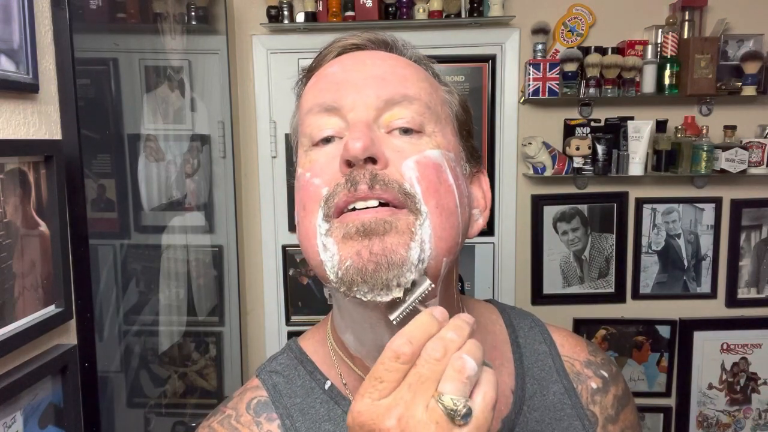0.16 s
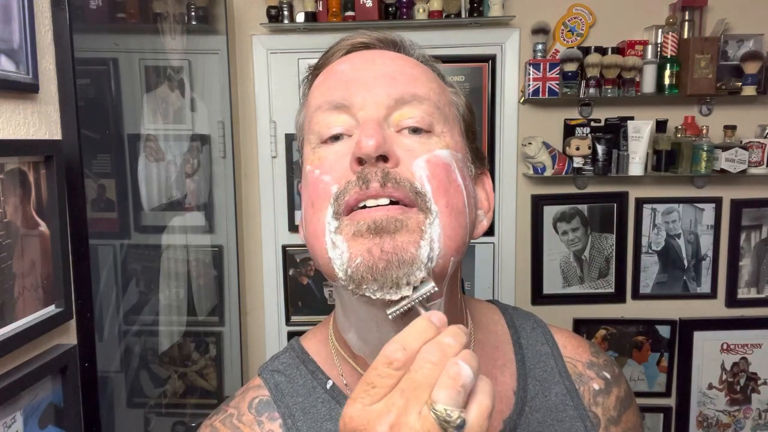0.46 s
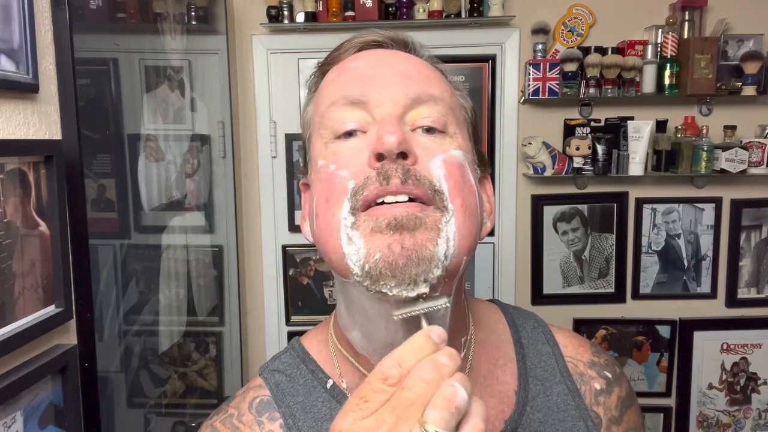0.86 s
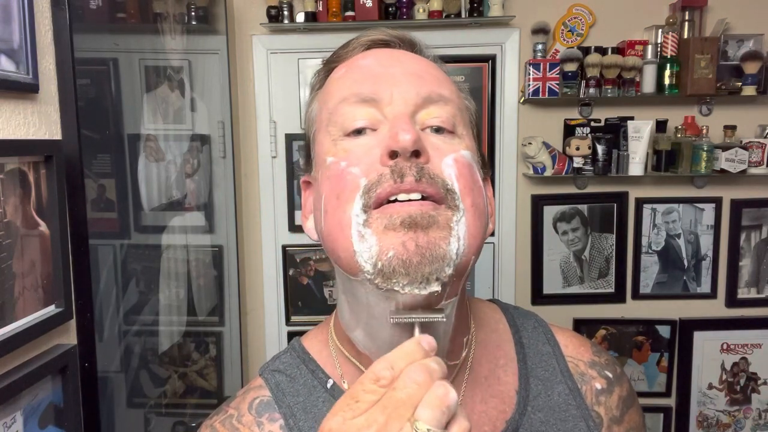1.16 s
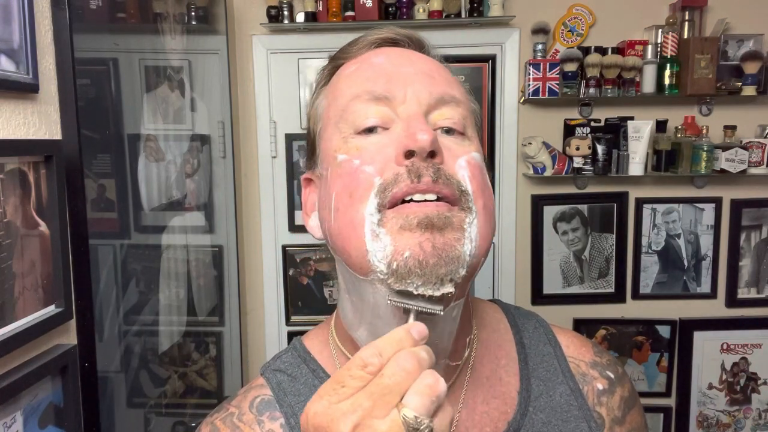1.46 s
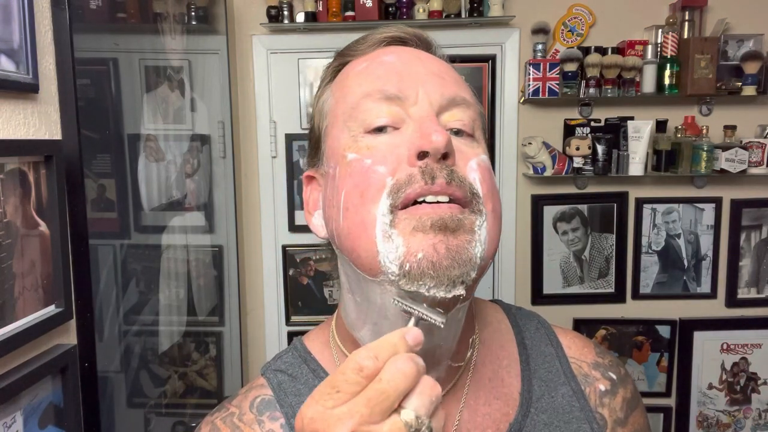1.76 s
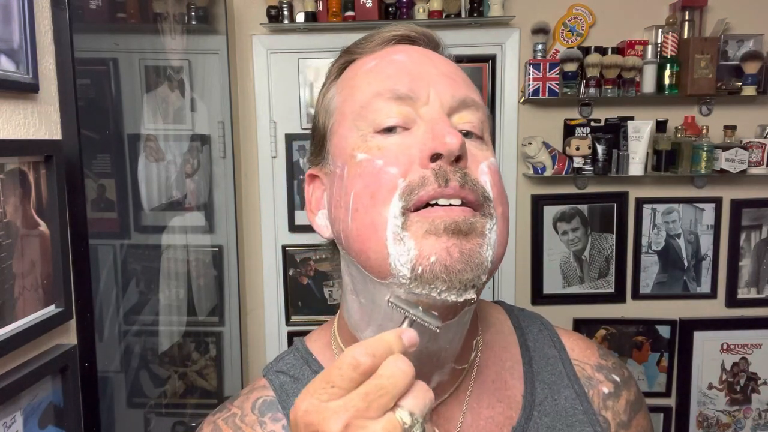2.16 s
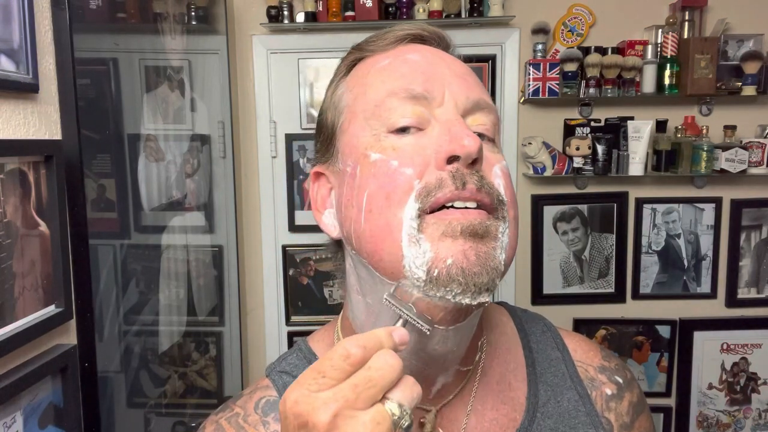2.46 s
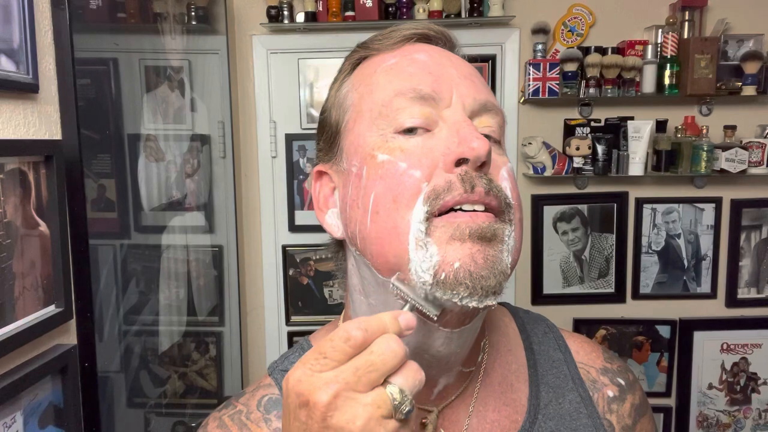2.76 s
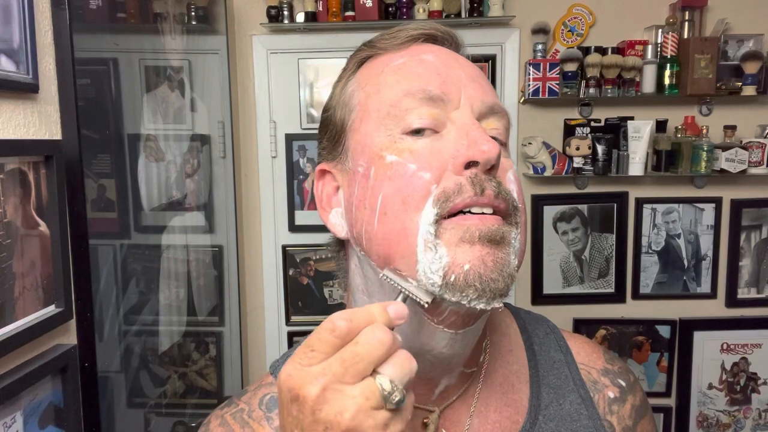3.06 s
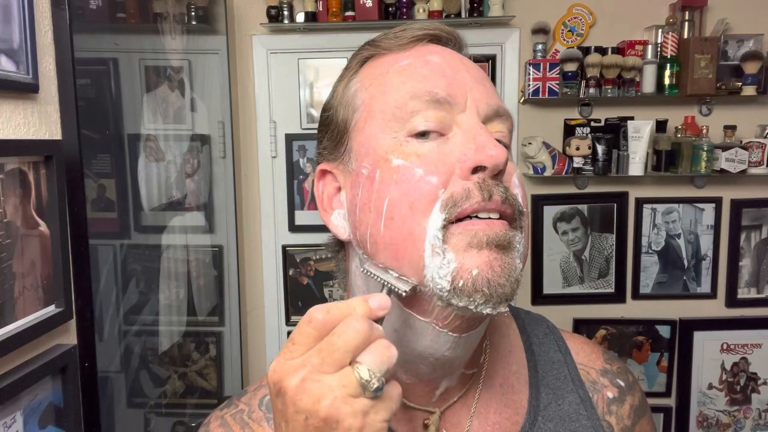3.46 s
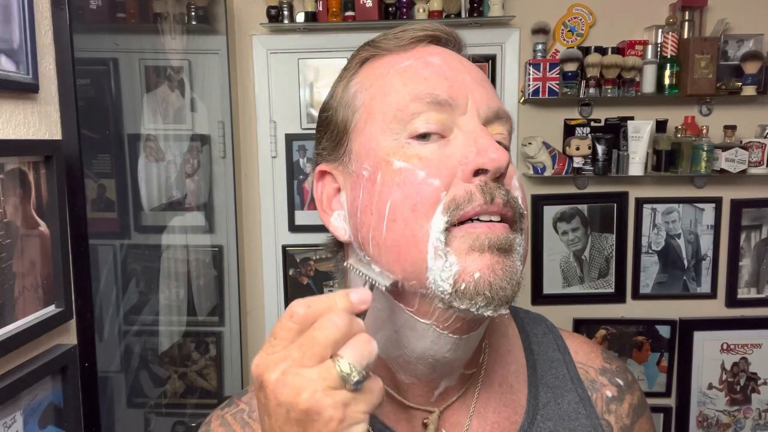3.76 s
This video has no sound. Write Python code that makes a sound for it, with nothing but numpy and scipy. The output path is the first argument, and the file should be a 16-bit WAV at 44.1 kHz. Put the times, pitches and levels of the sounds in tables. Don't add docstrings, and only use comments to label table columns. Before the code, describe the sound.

Close, dry razor scratches come in quick clusters separated by pauses, with faint lather fizz and sharp little clicks. A soft, deep door thump follows late, over low rumble and faint hiss in a small room.

```python
import sys
import numpy as np
from scipy import signal
from scipy.fft import rfft, irfft
from scipy.io import wavfile
from scipy.ndimage import uniform_filter1d

SR = 44100
rng = np.random.default_rng(int(sys.argv[2]) if len(sys.argv) > 2 else 0)


def to_linear_factor(level_db):
    exponent = np.asarray(level_db, float) / 20
    return 10 ** exponent


def to_wav(s):
    ch = np.atleast_2d(s).T
    pcm = np.round(np.clip(ch, -1, 1) * 32767)
    wavfile.write(sys.argv[1], SR, pcm.astype(np.int16))


N = 171990
T = np.arange(N) / SR
HZ = np.arange(N // 2 + 1) * SR / N


def over_hz(table):
    f, v = np.array(table, float).T
    return np.interp(np.log(HZ + 1), np.log(f + 1), v)


def over_time(table):
    return np.interp(T, *np.array(table).T)


def unit(x):
    return x / np.sqrt(np.mean(x ** 2))


def filtered(x, table):
    return irfft(rfft(x) * to_linear_factor(over_hz(table)), N)


def colour(x, table):
    return unit(filtered(x, table))


def ring(x, hz, width):
    return signal.lfilter(*signal.iirpeak(hz, hz / width, fs=SR), x)


def walk(rate):
    k = int(SR / rate)
    steps = np.repeat(rng.standard_normal(N // k + 1), k)
    smooth = uniform_filter1d(uniform_filter1d(steps, k), k)
    return unit(smooth[:N])


def stroke(start, length, db, tilt_db, rise, fall):
    u = T - start
    onset = np.clip(u / rise, 0, 1) ** 2
    release = np.exp(-np.clip(u - length, 0, None) / fall)
    slant = tilt_db * (np.clip(u / length, 0, 1) - 1.5)
    return onset * release * to_linear_factor(db + slant)


def grains(rate, spread_db):
    size = (rng.random(N) < rate / SR) * to_linear_factor(spread_db * rng.exponential(size=N))
    return size * np.sign(rng.standard_normal((2, N)))


# (frequency [Hz], level [dB])
ROOM_COLOUR = [(25, -9), (45, -1), (115, 3), (150, -12), (205, -13.5), (270, -20.5), (370, -17),
               (520, -26.5)]
# (frequency [Hz], level [dB])
HISS_COLOUR = [(400, -6.5), (1000, -1), (2000, -2.5), (4000, -8.5), (6000, -10), (9000, -9.5),
               (12500, -12.5), (16000, -31)]
# (time [s], level [dB])
RUMBLE_LEVEL = [
    (0, -65),
    (2.9, -65),
    (3.2, -62.5),
    (3.4, -59),
    (3.9, -67),
]


def floor():
    rumble = colour(rng.standard_normal((2, N)), ROOM_COLOUR + [(1000, -36.5), (3000, -54)])
    rumble = rumble * to_linear_factor(over_time(RUMBLE_LEVEL) + walk(12))
    hiss = colour(rng.standard_normal((2, N)), HISS_COLOUR)
    return rumble + to_linear_factor(-83.5) * hiss


# (frequency [Hz], level [dB], rise [s], time to fade 60 dB [s], delay [s])
DOOR_PANEL = [(228, -34.5, 0.0027, 0.23, 0.0057), (324, -32, 0.0024, 0.13, 0.00358),
              (514, -34, 0.0075, 0.066, 0.019), (615, -39.5, 0.00064, 0.051, 0.00216),
              (727, -50.5, .004, 0.11, 0.0075), (886, -53.5, 0.006, 0.091, 0.014),
              (107.8, -37, 0.012, 0.52, .055), (218.5, -42, 0.011, 0.476, .05),
              (382.5, -34.5, 0.0055, .1, 0.00593), (594, -50.5, 0.0068, 0.18, .035)]
# (frequency [Hz], level [dB], time to fade 60 dB [s])
HOUSE_RING = [(65.6, -41.5, 0.87), (90, -43, 0.49), (115.2, -32, 0.64), (167, -35.5, 0.64),
              (228.5, -34, 0.51), (321.5, -31.5, 0.31), (371.6, -44, 0.48), (548, -44.5, 0.33),
              (710, -54.5, 0.22), (1122, -52, 0.18), (1740, -58.5, 0.17)]


def door():
    thump_s, swell_late_s, swell_s, swell_hz = 3.594, 0.004, 0.048, 113
    u = np.clip(T - thump_s, 0, None)
    twin = np.array([[0], [np.pi / 2]])

    v = np.clip((u - swell_late_s) / swell_s, 0, 1)
    swell = np.sin(np.pi * v ** 1.55) * np.sin(2 * np.pi * swell_hz * (u - swell_late_s) + twin)
    out = to_linear_factor(-17.5) * swell

    for hz, db, rise, t60, late in DOOR_PANEL:
        v = np.clip(u - late, 0, None)
        envelope = to_linear_factor(db - 60 * v / t60) * (1 - np.exp(-v / rise))
        out = out + 2 * envelope * np.sin(2 * np.pi * hz * v + twin)

    rise_cycles = 4.5
    for hz, db, t60 in HOUSE_RING:
        band = rng.standard_normal((2, N))
        for _ in range(3):
            band = ring(band, hz, hz / 2.7)
        onset = np.clip(u * hz / rise_cycles, 0, 1) ** 2
        out = out + unit(band) * to_linear_factor(db - 60 * u / t60) * onset
    return out


# (time [s], peak level [dB], centre frequency [Hz])
TICKS = [(0.0267, -46.5, 9100), (0.201, -58, 11500), (0.215, -56, 12500), (0.258, -45, 10400),
         (0.282, -49, 11200), (0.292, -52, 12100), (0.667, -56, 10400), (0.7528, -49.5, 12600),
         (1.07, -58, 11000), (1.0908, -40.5, 12700), (1.1, -54, 12000), (1.1608, -57, 10600),
         (1.206, -56.5, 10000), (1.215, -58, 11000), (1.273, -58.5, 10900), (1.8412, -61, 9500),
         (2.032, -57, 12900), (2.04, -57.5, 11000), (2.4598, -37.5, 9300), (2.645, -63, 10600),
         (2.8714, -67, 11700), (2.8833, -48.5, 10500), (3.163, -60, 11900), (3.26, -38, 13300),
         (3.487, -57, 10800), (3.6556, -43.5, 13500), (3.659, -47, 11300), (3.6806, -50.5, 10400),
         (3.8811, -64, 10800)]
# (frequency [Hz], level [dB])
TICK_COLOUR = [(1500, -30), (2500, -16), (5000, -10), (8000, -3), (10000, 0), (15000, 0), (16400, -5),
               (17000, -30)]


def ticks():
    out = np.zeros(N)
    for s, db, hz in TICKS:
        near = slice(int(s * SR) - 40, int(s * SR) + 80)
        u = T[near] - s
        click = np.exp(-(u / .00007) ** 2) * np.cos(2 * np.pi * hz * u)
        broad = 1.01 * np.exp(-(u / .00003) ** 2)
        out[near] += to_linear_factor(db + 4) * (click + broad)
    out = filtered(out, TICK_COLOUR)
    peel_s, peel_db = 0.0007, -14
    out = out + to_linear_factor(peel_db) * np.roll(out, -int(peel_s * SR))
    return np.array([out, np.roll(out, 9)])


# (start [s], length [s], level [dB], tilt over the burst [dB])
FIZZ = [(0.01, 0.076, -84, -10.5), (0.113, 0.074, -70, -0.5), (0.17, 0.085, -65.5, -1),
        (0.238, 0.07, -67.5, 2.5), (0.406, 0.096, -84, -5.5), (0.555, 0.092, -69.5, 2.5),
        (0.65, 0.074, -65.5, -0.5), (0.886, 0.068, -80, 3), (1.052, 0.049, -66, 6),
        (1.076, 0.081, -60.5, 2), (1.185, 0.028, -68, -2.5), (1.255, 0.022, -77, -1),
        (1.436, 0.11, -71.5, 2), (1.536, 0.086, -70, 0), (1.827, 0.051, -75, 2), (1.936, 0.098, -71.5, 4.5),
        (2.317, 0.11, -62, 7), (2.437, 0.055, -70, 0), (2.625, 0.045, -70, -1.5), (2.693, 0.12, -74, -1),
        (2.85, 0.04, -71, -2), (3.005, 0.065, -79, -1), (3.123, 0.12, -67, 0), (3.253, 0.046, -69, 6.5),
        (3.48, 0.12, -58.5, 6.5), (3.635, 0.046, -70.5, -1.5), (3.859, .06, -75, -6)]
# (frequency [Hz], level [dB])
FIZZ_COLOUR = [(4000, -19.5), (7000, 5), (9000, 3), (10500, 0.5), (13000, -3.5), (15900, -4.5),
               (16300, -29)]


def lather():
    bubbles = grains(9000, 2.3)
    fizz = colour(bubbles * to_linear_factor(0.23 * walk(55)), FIZZ_COLOUR)
    rise_s, fall_s = 0.028, 0.018
    return fizz * sum(stroke(s, n, db, tilt, rise_s, fall_s) for s, n, db, tilt in FIZZ)


def stubble():
    hairs = grains(5000, 2.2)
    clumps = walk(90)
    clumps = clumps - uniform_filter1d(clumps, int(0.022 * SR))
    cluster_db, drag_db = 3.6, 0.1
    return hairs * to_linear_factor(cluster_db * clumps + drag_db * walk(20))


# (frequency [Hz], width [Hz], level [dB])
HEAD = [(2544, 190, 0.5), (3456, 640, -2), (4045, 63, -1.5), (4455, 116, -0.5), (5230, 480, -3.5),
        (5896, 360, 1), (6757, 270, 3.5)]
# (frequency [Hz], level [dB])
CUT_COLOUR = [(1500, -29), (2000, -6.5), (2500, -4), (3300, -7), (4500, -7.5), (6500, -6), (8200, 6),
              (12000, -24.5)]
# (time [s], lowest tone level [dB], brightness, above against below 4500
# Hz [dB])
ANGLE = [(0, -4, -5.5), (.6, -6.5, -11.5), (.75, -19, 0), (1.05, -2, -3), (1.45, -2, -14.5), (1.6, -1, 6),
         (1.87, 4, -5), (2, 1, -0.5), (2.28, -0.5, -9), (2.42, 5.5, -13), (2.7, 11.5, -20.5),
         (2.82, 10.5, -3.5), (3.1, 8, -1.5), (3.24, 10.5, -13.5), (3.47, 12.5, -0.5), (3.9, 18.5, -5.5)]


def blade(hairs):
    tones = [to_linear_factor(db + 2.0 * walk(6.91)) * ring(hairs, hz, width) for hz, width, db in HEAD]
    when, low_db, bright = np.array(ANGLE).T
    lowest = tones[0] * to_linear_factor(np.interp(T, when, low_db))
    head = unit(sum(tones[1:]) + lowest)
    cut = unit(colour(hairs, CUT_COLOUR) + to_linear_factor(-4.5) * head)

    upper = signal.sosfilt(signal.butter(2, 4500, "high", fs=SR, output="sos"), cut)
    lower = signal.sosfilt(signal.butter(2, 4500, fs=SR, output="sos"), cut)
    bright = np.interp(T, when, bright)
    return to_linear_factor(-bright / 2) * lower - to_linear_factor(bright / 2) * upper


# (start [s], length [s], level [dB], skin level [dB], tilt over the stroke [dB])
CUTS = [(0.094, 0.024, -73.5, -19, 3), (0.109, 0.038, -67.5, -31, -3), (0.149, 0.039, -64.5, -38, 1),
        (0.188, 0.065, -67.5, -30, 0), (0.448, 0.069, -80, -31, -3), (0.528, 0.082, -61, -43, 8),
        (0.615, 0.076, -69.5, -18, 1.5), (0.689, 0.032, -67.5, -16.5, 0), (0.92, 0.088, -79, -7, 2.5),
        (1.024, 0.025, -70.5, -15, 2.5), (1.049, 0.037, -69.5, -15, -1), (1.092, 0.053, -65, -12, 1.5),
        (1.39, 0.037, -81, -16, 2.5), (1.43, 0.058, -61.5, -18, 5), (1.494, 0.057, -63.5, -17, 4),
        (1.547, 0.041, -63, -15, 1), (1.837, 0.0062, -73, -21, -4), (1.854, 0.058, -66.5, -16.5, 0.5),
        (1.909, 0.03, -64, -19, 0), (1.942, 0.057, -66.5, -24, 2.5), (2.256, 0.056, -69.5, -5.5, 4),
        (2.313, 0.053, -64.5, -10, 0.5), (2.373, 0.055, -65, -12, 3.5), (2.639, 0.055, -73, 3, 8.5),
        (2.705, 0.033, -62.5, -1.5, 6), (2.735, 0.018, -59, -4, 4), (2.771, 0.064, -76, -6.5, -6.5),
        (3.076, 0.096, -68, -21, -1.5), (3.176, 0.06, -67, -30, -0.5), (3.442, 0.016, -72, -9, 5),
        (3.461, 0.057, -65, -10, 1.5), (3.509, 0.051, -64.5, -21, 1.5), (3.561, 0.063, -68, -13, -1),
        (3.868, .05, -63.5, -21, 1)]
# (frequency [Hz], level [dB])
SKIN_COLOUR = [(700, -28), (1050, -23), (1350, 10), (1750, 12), (2200, 2), (3000, -32)]


def pressure(skin_share):
    rise_s, fall_s = 0.012, 0.011
    return sum(stroke(s, n, db + skin_share * skin_db, tilt, rise_s, fall_s)
               for s, n, db, skin_db, tilt in CUTS)


def razor():
    hairs = stubble()
    jaw_hz, jaw_width_hz, jaw_db = 1158, 240, -4
    jaw = unit(ring(ring(hairs, jaw_hz, jaw_width_hz), jaw_hz, jaw_width_hz))
    skin = colour(hairs, SKIN_COLOUR)
    return blade(hairs) * pressure(0) + skin * pressure(1) + to_linear_factor(jaw_db) * jaw * pressure(2)


def room(pair, wet_db, echo_db, t60):
    mirror_s = 0.00125
    u = T[:SR // 2]
    tail = rng.standard_normal((2, len(u))) * to_linear_factor(-60 * u / t60) * np.clip(u / 0.0004, 0, 1)
    tail *= to_linear_factor(wet_db) / np.sqrt(np.sum(tail[0] ** 2))
    tail[:, 0] = 1
    tail[:, int(mirror_s * SR)] += to_linear_factor(echo_db)
    return signal.fftconvolve(pair, tail, axes=1)[:, :N]


# (frequency [Hz], phase [radians])
LEAD = [(0, 0), (400, 0), (1400, -.4), (2000, -2.9), (2600, -1.4), (3300, -3.6), (5000, -3.4), (6000, -4.8),
        (7000, -3.3), (8800, -2.9), (10900, -.12), (12700, .15), (14500, 2.75), (17000, 3.3)]


def ports(pair, like, right):
    a, b = rfft(pair)
    c = np.clip(over_hz(like), 0, 1)
    lead = np.interp(HZ, *np.array(LEAD).T)
    mixed = c * a * np.exp(-1j * lead) + np.sqrt(1 - c * c) * b
    return irfft(np.array([a, to_linear_factor(over_hz(right)) * mixed]), N)


# (frequency [Hz], gain [dB])
RIGHT = [(60, 0.74), (300, 1.6), (1400, 2.93), (2300, 0.33), (3300, 3.8), (4000, 5.5), (6000, 2.9),
         (7500, 1.76)]
# (frequency [Hz], gain [dB])
DOOR_RIGHT = [(60, -.5), (120, .7), (220, 0), (320, -1.5), (500, 5), (1000, -2)]
# (frequency [Hz], likeness [0-1])
NEAR_LIKE = [(500, .3), (1400, .65), (2600, .8), (3300, .25), (5000, .35), (6500, .45), (7200, .96),
             (9200, .9), (11000, .94)]
# (frequency [Hz], likeness [0-1])
DOOR_LIKE = [(60, .985), (130, .992), (220, .9), (320, .72), (500, .2), (1000, .2)]
# (frequency [Hz], likeness [0-1])
FAR_LIKE = [(60, 0.88), (130, 0.9), (220, 0.36), (320, 0.26), (700, 0.033), (6000, 0.13), (7500, 0.79),
            (16000, 0.88)]


def scene():
    near = room(razor(), -3, -23.5, 0.2)
    near = near + room(lather(), -7, -11, 0.2)
    near = near + room(ticks(), -4, -2, 0.12)
    near = near - 0.6 * ring(near, 7600, 800)
    background = ports(floor(), FAR_LIKE, RIGHT) + ports(door(), DOOR_LIKE, DOOR_RIGHT)
    return background + ports(near, NEAR_LIKE, RIGHT)


def roll_off(x):
    return signal.sosfilt(signal.butter(12, 16470, fs=SR, output="sos"), x)


def record(dry):
    return roll_off(dry)


dry = scene()
out = record(dry)
to_wav(out)
```